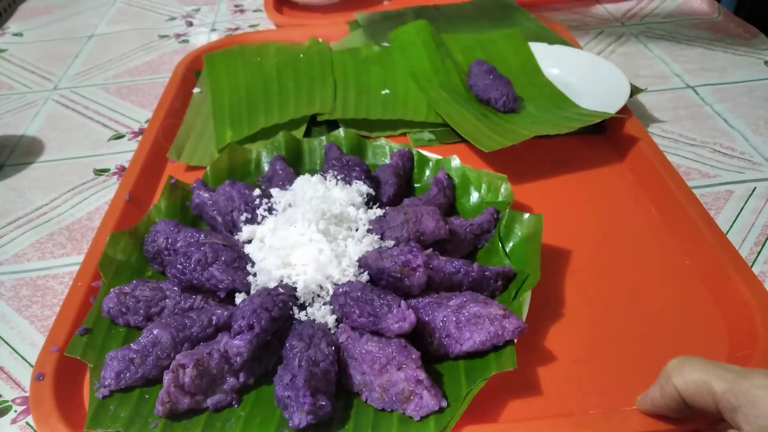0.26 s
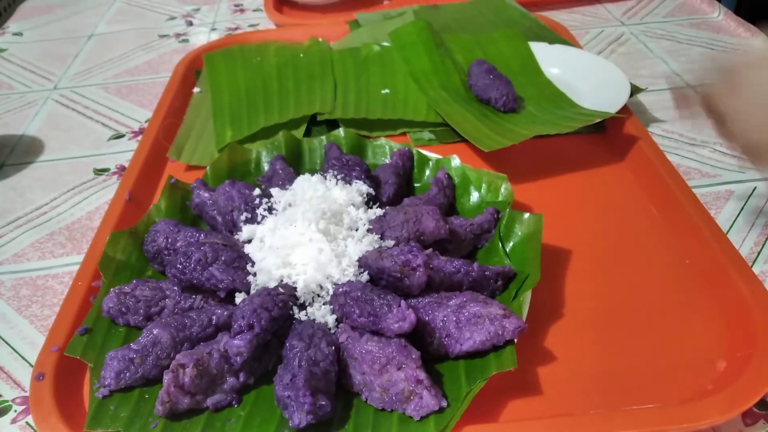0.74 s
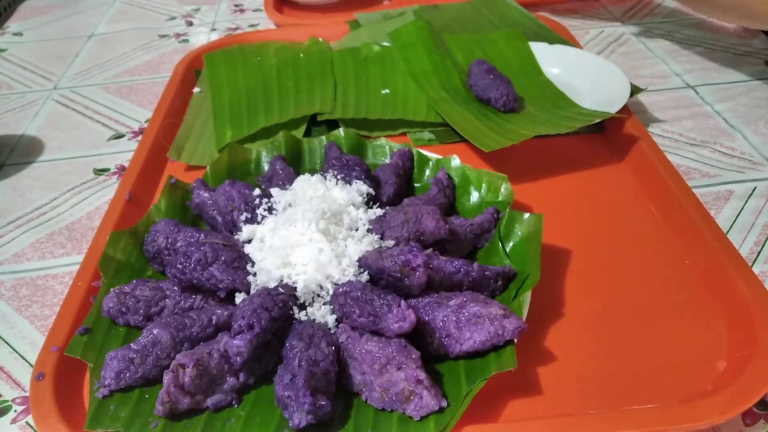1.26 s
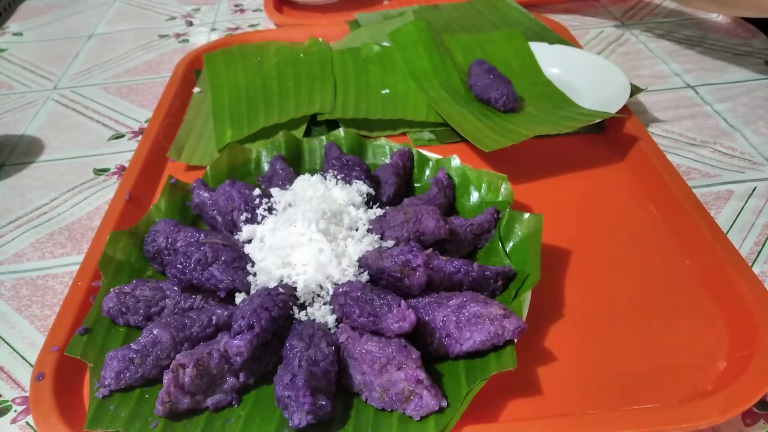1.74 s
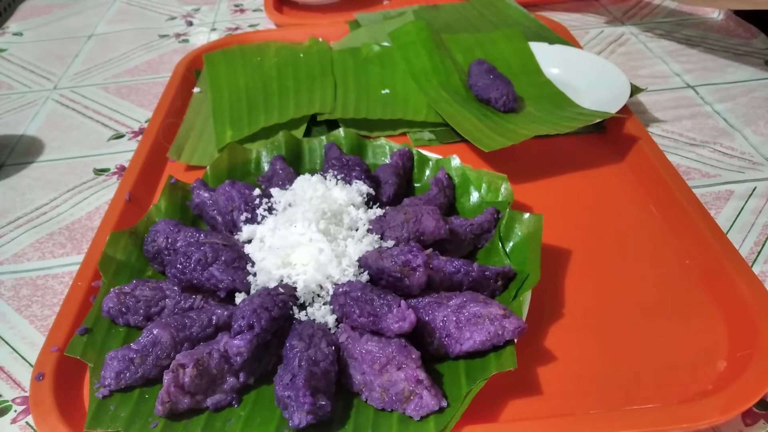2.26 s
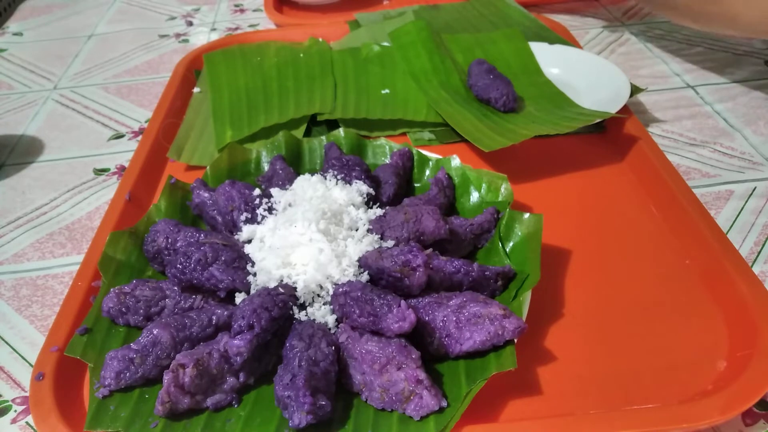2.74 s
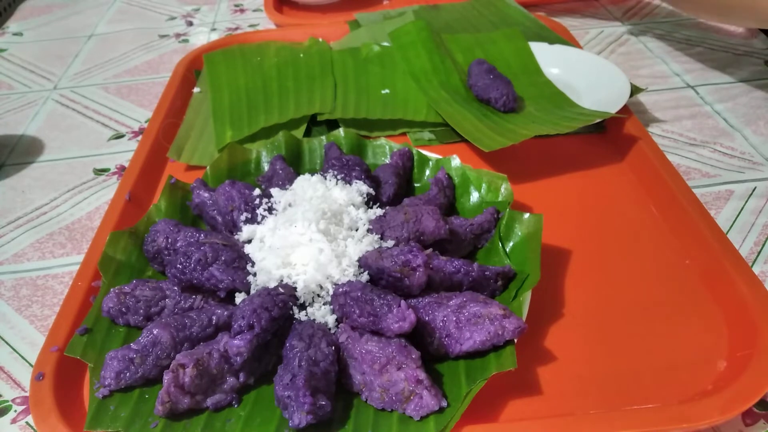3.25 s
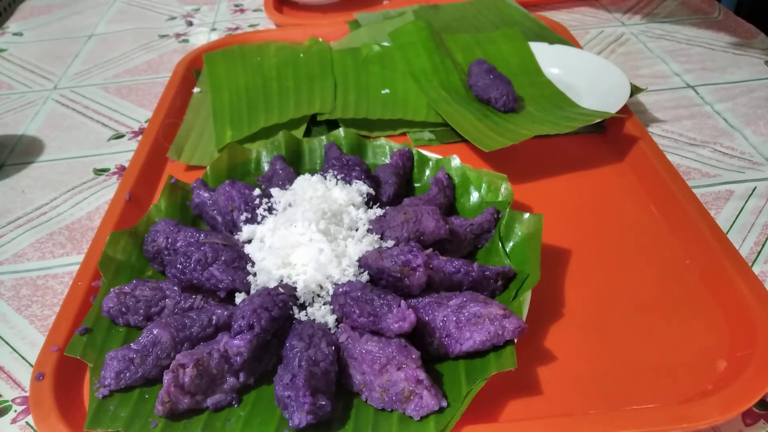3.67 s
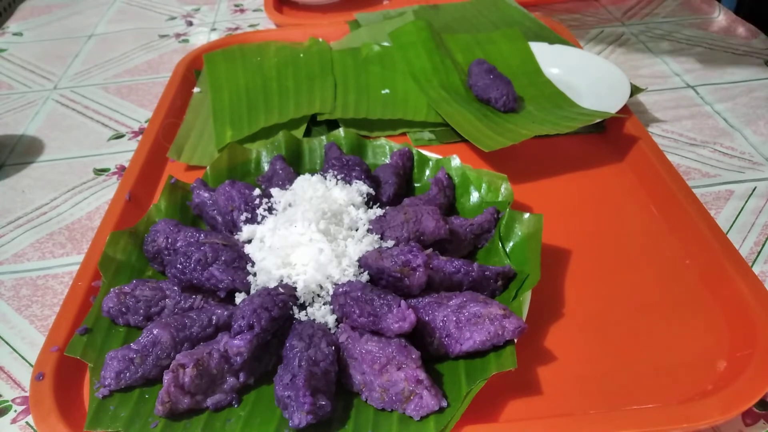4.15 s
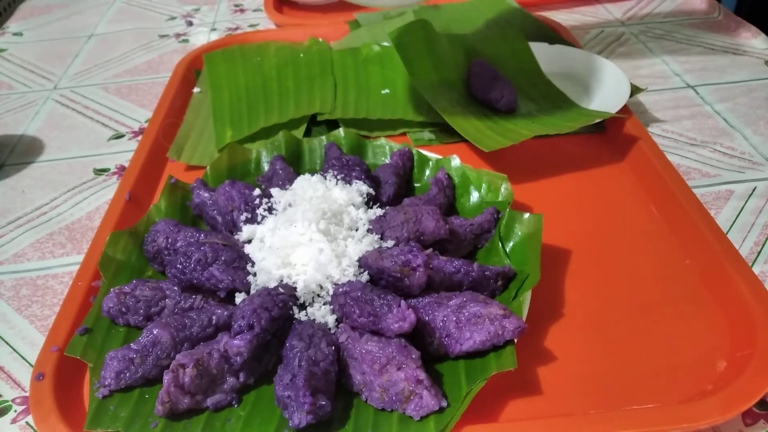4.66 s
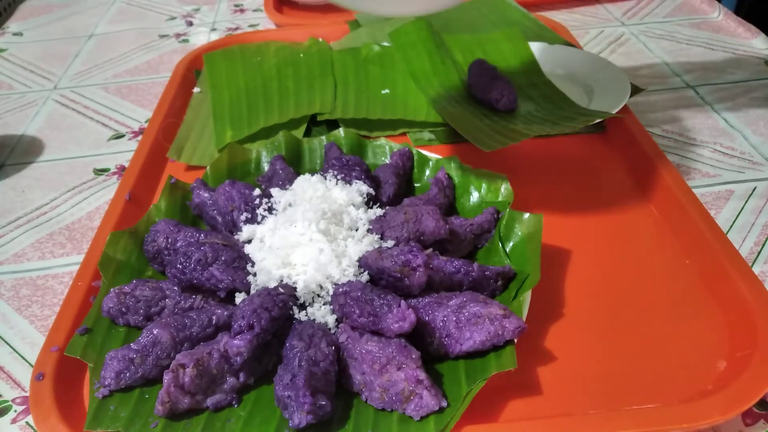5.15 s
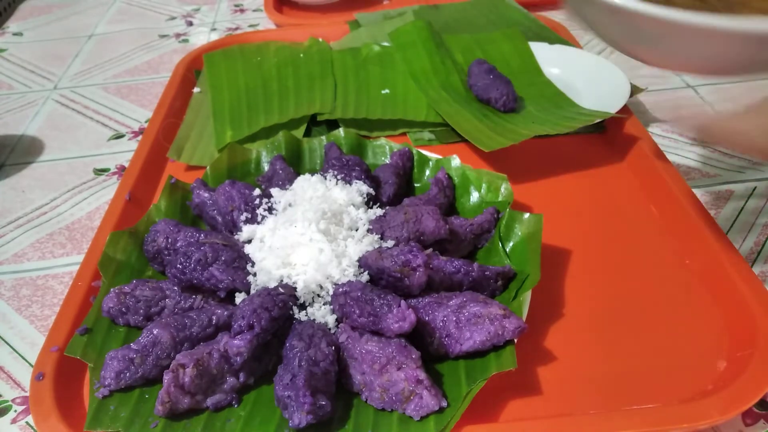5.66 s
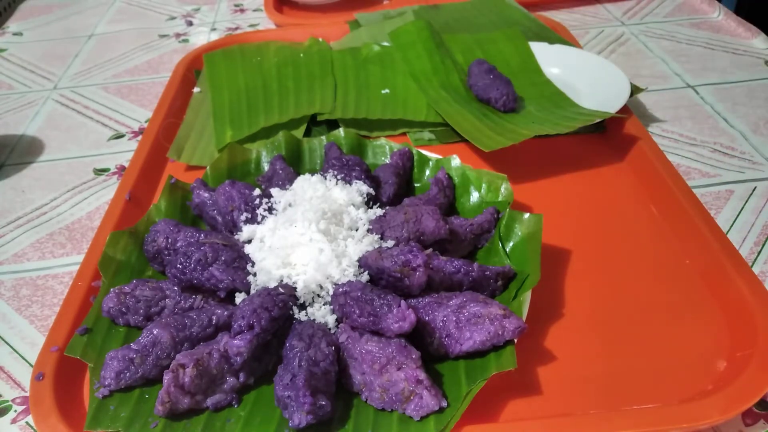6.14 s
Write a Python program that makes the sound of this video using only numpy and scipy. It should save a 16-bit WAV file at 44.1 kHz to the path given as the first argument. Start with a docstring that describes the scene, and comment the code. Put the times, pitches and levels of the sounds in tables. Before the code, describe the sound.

Stereo phone pickup, near and dry, small quiet room. Crisp film crackling starts faintly, swells around one second, ebbs and returns in small squeezes. A very soft clatter of dishes passes near three seconds. Denser snaps and quick little finger strokes follow, and finally one blunt, hollow bowl knock stands far above everything, ringing briefly with tiny settling bounces and last plastic snaps.

```python
"""A hand in a thin plastic glove gathers and sprinkles grated coconut, close to a phone in a quiet kitchen.
The film and the flakes rustle as dense tiny clicks that burst into noise, and single creases snap as short bursts.
Dishes nudge the table as blunt blows with a ring, and slide a little as stick and slip in one resonance.
Near the end a bowl is set down with a dull knock that rings the tray and the table top into the room.
The two microphone ports hear the sound slightly apart, over a low rumble and a thin hiss of room air."""
import sys
import numpy as np
from scipy import signal
from scipy.fft import rfft, irfft
from scipy.io import wavfile
from scipy.ndimage import uniform_filter1d

SR = 44100
rng = np.random.default_rng(int(sys.argv[2]) if len(sys.argv) > 2 else 0)


def log_audio(samples):
    """Write samples as a 16-bit WAV file to the path given in sys.argv[1]."""
    # one column per channel
    frames = np.atleast_2d(samples).T
    # limit to full scale, then quantise
    limited = np.clip(frames, -1, 1)
    pcm = np.round(limited * 32767).astype(np.int16)
    wavfile.write(sys.argv[1], SR, pcm)


N = 282240  # samples, 6.4 s
TIME = np.arange(N) / SR  # s

# Where the hand is and what it holds, joined by straight lines.
# Each row: time in seconds, left minus right in dB, loose flakes against the fine crackle in dB.
HAND_PLACE = [(0, 2, -4.5), (.8, 1, -38), (1.4, 0, -6), (2.8, 1.5, -37), (4.3, 1.5, -2), (5.3, 0.5, -15),
              (5.8, 3.5, 0), (6.4, 2.5, -6.5)]
# Bouts of handling, levels before the gains of the rustle.
# Each row: start in seconds, length in seconds, attack in seconds, crackle level in dB, rubbing level in dB.
HANDLING_BOUTS = [(0.017, 0.29, 0.067, -66.5, -73.5), (0.505, 0.61, 0.17, -51, -66.5),
                  (1.144, 0.78, .088, -58.5, -74), (2.112, 0.93, 0.38, -58.5, -69.5),
                  (2.564, 0.35, .051, -54.5, -75), (3.048, 0.12, 0.047, -64, -78),
                  (3.392, 0.37, 0.079, -61, -82), (3.616, 0.67, 0.12, -58.5, -71.5),
                  (4.462, 0.24, 0.034, -58, -70), (4.876, 0.4, 0.12, -62, -76),
                  (5.346, 0.25, 0.27, -65, -73.5), (5.845, 0.36, 0.16, -62.5, -73.5),
                  (6.111, 0.036, .005, -49, -59.5), (6.207, 0.11, 0.027, -57.5, -65.5)]
BOUT_RELEASE_DB_PER_S = 133
# Brief squeezes of the fingers, levels before the gains of the rustle.
# Each row: peak in seconds, length in seconds, crackle level in dB.
FINGER_SQUEEZES = [(0.52, 0.029, -47), (0.672, 0.071, -51), (0.77, 0.04, -52), (0.807, 0.11, -49),
                   (0.911, 0.066, -42), (1.012, 0.035, -50.5), (1.065, 0.074, -49.5), (1.129, 0.061, -48),
                   (1.377, 0.072, -56), (1.475, .04, -60), (1.605, 0.058, -54.5), (1.96, 0.042, -57.5),
                   (2.464, 0.09, -57.5), (2.62, 0.16, -49), (2.971, 0.081, -49.5), (3.921, 0.06, -49),
                   (3.975, 0.18, -55), (4.148, 0.056, -51.5), (4.38, 0.099, -57.5), (5.035, 0.025, -53),
                   (5.21, 0.037, -52), (5.855, 0.028, -57), (5.944, 0.021, -53), (6.383, 0.058, -51)]
SQUEEZE_RUB_DB = -14.5  # rubbing against crackle in a squeeze
# A run of quick finger strokes, to and fro, each a small squeeze; the way back is lighter.
STROKES_START_S, STROKE_PERIOD_S, STROKE_LENGTH_S = 4.706, 0.086, 0.03
STROKE_DB, BACK_STROKE_DB = -56, -3  # the second is relative to the first
# Colour of the crackling film. Each row: frequency in Hz, relative level in dB.
FILM_COLOUR = [(1200, -34.5), (2500, -15.5), (4000, -12), (6000, -6.5), (7500, -2), (9500, 2.5), (11500, 0),
               (14000, -6), (16000, -4)]
# Colour of the rubbing fingers. Each row: frequency in Hz, relative level in dB.
RUB_COLOUR = [(150, -11.5), (350, 2.5), (600, 2.5), (1000, 3), (1400, -1), (2100, 4.5), (3300, 3),
              (6000, 5.5), (12000, -41.5)]

# The loudest creases that snap, levels before the common gain of the snaps.
# Each row: start in seconds, level in dB, left minus right in dB, lower body against the bright tip in dB.
LOUD_SNAPS = [(0.0175, -47.5, -3, -11), (.279, -61, 0, -14), (.427, -54, -2, -8), (0.4506, -50, 4, -13),
              (0.4665, -51, 0, -14), (0.5, -43.5, 0, -7), (1.0105, -44.5, 0, -21), (1.35, -46.5, 7, 2),
              (1.452, -44, -1, -23.5), (1.5625, -48.5, -2, -20), (2.9568, -46, 6, -18),
              (3.108, -46.5, 0, -8), (3.701, -52, 7, -4), (4.3918, -58, 1, -11), (4.5438, -50, -7, -11),
              (4.62, -48.5, 2, -4), (4.6383, -43.5, 4, -11), (4.7176, -41.5, -1, -20),
              (4.738, -47.5, 5, -9), (4.793, -52, 6, 2), (4.802, -49, 2, -16), (4.8118, -41, 3, -12),
              (4.8144, -43, -8, -16), (4.9044, -46, -1, -6), (4.951, -54, -1, -13), (4.9836, -42, -1, -28),
              (4.986, -49, -5, -18), (4.9963, -40, 7, -14), (5.127, -43.5, -2, -7.5),
              (5.1548, -42.5, 5, -16), (5.277, -50, -5, -12), (5.297, -47.5, -1, -8), (5.314, -48, 0, -12),
              (5.399, -50, 2, -8), (5.413, -51, 1, -11), (5.495, -49, 2, -12), (5.5494, -48.5, 5, -13),
              (5.815, -52.5, -4, -6), (5.8912, -46, 8, -15), (5.9065, -45, 6, -5), (5.9213, -47, 1, -6),
              (5.948, -52, 9, -15), (5.989, -48.5, 3, -9), (6.05, -51.5, 9, 2), (6.1125, -45.5, 8, -1),
              (6.2178, -41.5, 9, -7), (6.2316, -45, 6, -21), (6.2722, -46, 10, 4), (6.289, -46, 3, 2),
              (6.3004, -40.5, 8, -2), (6.313, -47, 4, -11), (6.3221, -43.5, 14, -25), (6.3809, -45, 5, -1),
              (6.3946, -49, 9, -1)]
# Spells in which lesser creases snap at random, levels before the common gain of the snaps.
# Each row: start in seconds, length in seconds, snaps per second, mean level in dB, mean left minus right in dB.
CRINKLE_SPELLS = [(1.305, .5, 13, -60, 3), (3.598, .7, 19, -60, 2), (4.301, 1.0, 30.7, -57.5, -2),
                  (5.32, .3, 23, -72, 2), (5.738, .1, 78, -60.5, 6), (5.87, .53, 60, -57, 10)]
CRINKLE_SPREAD_DB, CRINKLE_BODY_DB = -1.5, -10  # random spread of level; mean body against tip
# Bright tip of a snap. Each row: frequency in Hz, relative level in dB.
CREASE_TIP_COLOUR = [(800, -42), (2500, -45), (4500, -24), (7500, 3), (10000, 10.5), (13000, 3),
                     (16000, -5)]
# Lower body of a snap or of a flake's tick. Each row: frequency in Hz, relative level in dB.
CREASE_BODY_COLOUR = [(500, -25), (1500, -7), (2500, -13.5), (3600, -5), (4800, 1.5), (6500, 1.5),
                      (8500, 2), (14000, -21)]
# How fast the tick of a loose flake and the snap of a crease fall by 60 dB.
FLAKE_T60_S, SNAP_T60_S = .008, .005

# Dishes meeting the table, and the bowl bouncing as it settles.
# Each row: start in seconds, level in dB, contact pitch in Hz, contact time in seconds,
# crack against the blow in dB, gain of the ringing in dB.
DISH_KNOCKS = [(2.815, -53.5, 490, 0.00066, -7, -8.5), (2.816, -58, 130, .0042, -17, -21),
               (2.842, -57.5, 380, 0.00052, -8, -8), (4.612, -56, 144.5, 0.0054, -27, -32),
               (6.1444, -10.5, 476, 0.00093, -23, -13.5), (6.15, -26, 440, 0.00062, -17.5, -28),
               (6.1633, -29, 325, 0.0021, -13, -19), (6.2003, -40, 430, 0.0011, -22, -24),
               (6.377, -49.5, 420, 0.00091, 1, -7)]
# Short crack of a knock. Each row: frequency in Hz, relative level in dB.
CRACK_COLOUR = [(100, 3.5), (400, 6.5), (800, 7.5), (1300, -1.5), (2000, -5), (2800, -14), (4500, -14),
                (10000, -31)]
# Modes of the tray and the table top.
# Each row: frequency in Hz, relative level in dB, 60 dB decay in seconds, left minus right in dB.
TRAY_MODES = [(82.5, -24, 0.3, -5), (114, -22.5, 0.19, -3), (259, -15, 0.34, -2), (302.5, 2, 0.12, 0),
              (366, -11, 0.24, -2), (394, -15, 0.3, 2), (428, -11, 0.29, -4), (456, -7.5, 0.31, -7),
              (488, -23, 0.41, -8), (531.5, 0.5, 0.11, 3), (570, -16, 0.26, -4), (618, -17, 0.18, -2),
              (693, -13, .15, 0), (773, -10, 0.16, -11), (836, -19, 0.25, 4), (1076, -18, 0.18, -8),
              (1000, -17, .14, 3), (1040, -20, 0.17, -3), (1203, -17, 0.15, 4), (1249, -10.5, 0.097, 5),
              (1350, -14.5, .13, 0), (1445, -19, 0.13, 3), (1750, -21, .1, 2), (2070, -22, 0.15, -2)]
# Colour of the room's answer to a knock. Each row: frequency in Hz, relative level in dB.
ECHO_COLOUR = [(60, -18), (170, -4.5), (270, 3), (450, -10), (600, -7), (800, 1.5), (1200, 4.5), (2000, -3),
               (4000, -13), (10000, -13)]
# Dishes sliding a little; the first row is a faint low bump of the hand. # Each row: start in seconds, length
# in seconds, centre in Hz, width in Hz, level in dB.
SLIDES = [(0.076, 0.17, 129, 199, -65.5), (2.405, 0.074, 3230, 1400, -64), (2.49, 0.25, 564, 70, -74),
          (2.624, 0.057, 2110, 1100, -62), (2.816, 0.057, 330, 560, -65), (2.83, 0.19, 540, 90, -72),
          (4.163, 0.11, 590, 98, -68), (4.6, 0.2, 90, 110, -72)]

# Colour of the quiet room. Each row: frequency in Hz, relative level in dB.
AIR_COLOUR = [(20, 12), (35, 3.5), (60, 1.5), (100, -10), (185, -3.5), (260, -8.5), (600, -16),
              (1200, -22.5), (3500, -26), (9500, -29.5), (15000, -39)]
# How much the two ports differ in diffuse sound. Each row: frequency in Hz, side against mid in dB.
PORT_WIDTH = [(100, -9.5), (300, -10), (600, -5.5), (1200, -2), (2400, -3), (4000, 1), (8000, -1.5)]
# The left port against the right one. Each row: frequency in Hz, left minus right in dB.
PORT_DIFFERENCE = [(100, 0), (2000, -0.1), (5000, -0.5), (7500, -2.5), (9200, -3.5), (10500, 0.5),
                   (12500, 7), (15000, 4.5)]
TOP_HZ = 14250  # upper limit of the phone


def rustle(film_gain_db=1.57, rub_gain_db=2.0, grip_db=1.4, flake_body_db=-8):
    """Film and flakes crackle finely; under it the fingers rub with a duller hiss."""
    film_db, rub_db = hand()
    side_db, loose_db = curves(HAND_PLACE)
    # the fingers catch and slip
    slip_db = grip_db * walk(28)
    # every grain faces the two ports differently
    clicks = grains(rate=2400, spread_db=2.0) * pan(4 * rng.standard_normal(N))
    # a short burst and a longer wash from each click
    fine = unit(smear(clicks, t60=.005) + smear(clicks, t60=.1))
    # loose flakes tick more sparsely and with more body
    ticks = grains(rate=360, spread_db=2.8) * pan(4 * rng.standard_normal(N))
    loose = unit(smear(ticks, t60=FLAKE_T60_S))
    flake_body = unit(colour(loose, CREASE_BODY_COLOUR))
    flakes = unit(colour(loose, FILM_COLOUR)) + undb(flake_body_db) * flake_body
    film = unit(unit(colour(fine, FILM_COLOUR)) + undb(loose_db) * flakes)
    rub = unit(colour(diffuse(smear(clicks, t60=0.066)), RUB_COLOUR))
    sound = film * undb(film_db + film_gain_db) + rub * undb(rub_db + rub_gain_db)
    return sound * undb(slip_db) * pan(side_db)


def hand():
    """Crackle and rubbing levels in dB: bouts of handling with squeezes swelling on top, adding in power."""
    film_power = rub_power = 1e-12
    for start, length, attack, film_db, rub_db in HANDLING_BOUTS:
        bout = held(start, length, attack, BOUT_RELEASE_DB_PER_S)
        film_power = film_power + (bout * undb(film_db)) ** 2
        rub_power = rub_power + (bout * undb(rub_db)) ** 2
    for peak, length, db in FINGER_SQUEEZES + strokes():
        swell = undb(db) * np.exp(-np.minimum((2 * (TIME - peak) / length) ** 2, 20))
        film_power = film_power + swell ** 2
        rub_power = rub_power + (swell * undb(SQUEEZE_RUB_DB)) ** 2
    return 10 * np.log10(film_power), 10 * np.log10(rub_power)


def strokes(count=8):
    """The run of finger strokes as rows of squeezes, every second one lighter."""
    return [(STROKES_START_S + k * STROKE_PERIOD_S, STROKE_LENGTH_S, STROKE_DB + k % 2 * BACK_STROKE_DB)
            for k in range(count)]


def snaps(level_db=20.5, room_db=-27, room_t60=0.18):
    """A crease flips in a burst of a few milliseconds, with a faint wash; its bright tip has a lower body."""
    t = TIME[:SR // 10]
    envelope = fade(t, SNAP_T60_S) + undb(room_db) * fade(t, room_t60)
    tips, bodies = np.zeros((2, 2, N))
    for start, db, side_db, body_db in LOUD_SNAPS + crinkles():
        # one burst for the tip and one for the body, each at both ports with energy 1
        burst = rng.standard_normal((2, 2, len(t))) * envelope
        burst = burst / np.linalg.norm(burst, axis=2, keepdims=True)
        # tip and body share the energy of the snap
        tip, body = burst * undb(db + level_db) * pan(side_db) / np.hypot(1, undb(body_db))
        add(tips, start, tip)
        add(bodies, start, body * undb(body_db))
    # colouring leaves the overall level of each part alone
    bright = unit(colour(tips, CREASE_TIP_COLOUR)) * np.std(tips)
    low = unit(colour(bodies, CREASE_BODY_COLOUR)) * np.std(bodies)
    return bright + low


def crinkles():
    """Lesser snaps scattered through each spell, as rows like the loud ones."""
    rows = []
    for start, length, rate, db, side_db in CRINKLE_SPELLS:
        chance = rng.standard_normal((64, 3))
        # one random moment in each slot of 1 / rate
        moments = (np.arange(len(chance)) + rng.random(len(chance))) / rate
        for s, (a, b, c) in zip(moments, chance):
            if s < length and start + s < TIME[-1]:
                level_db = db + CRINKLE_SPREAD_DB * a
                rows.append((start + s, level_db, side_db + 4 * b, CRINKLE_BODY_DB + 5 * c))
    return rows


def knocks(echo_db=-11.0, echo_t60=0.39, crack_t60=0.058, left_db=3, edge_db=6):
    """A blunt contact and a short crack, then the ringing tray and the room."""
    out, t = np.zeros((2, N)), TIME[:SR // 2]
    # the wave reaches the left port 0.3 ms before the right one
    age = np.maximum(t - np.array([[0], [.0003]]), 0)
    for start, db, hz, contact, crack_db, ring_db in DISH_KNOCKS:
        # the push peaks at twice the contact time
        push = (age / (2 * contact)) ** 2 * np.exp(2 - age / contact)
        blow = -np.sin(2 * np.pi * hz * age) * push
        grit = unit(colour(diffuse(rng.standard_normal((2, len(t)))), CRACK_COLOUR))
        # the hard rim lands first, as one sharp edge
        edge = -np.sin(2 * np.pi * 2100 * age) * fade(age, 0.002)
        crack = grit * fade(t, crack_t60) + undb(edge_db) * edge
        strike = blow + undb(crack_db) * crack
        # the room answers with decaying noise that builds up over 7 ms
        walls = diffuse(rng.standard_normal((2, len(t)))) * fade(t, echo_t60) * np.minimum(t / 0.0069, 1)
        echo = signal.fftconvolve(strike, colour(walls, ECHO_COLOUR), axes=1)[:, :len(t)]
        echo = unit(echo) * np.std(strike) * undb(echo_db)
        ring = undb(ring_db) * tray(age, hz, contact)
        add(out, start, undb(db) * (strike + ring + echo))
    return out * pan(left_db)


def tray(age, blow_hz, contact, build_up=0.0034):
    """The tray's modes swell in step with the blow that drives them, then ring out; each has its own balance."""
    ring = 0
    for hz, db, t60, side_db in TRAY_MODES:
        # phase lag set by the mode's distance from the pitch of the blow
        lag = 3 * np.arctan(2 * np.pi * (hz - blow_hz) * contact)
        mode = np.sin(2 * np.pi * hz * age - lag) * fade(age, t60)
        ring = ring - undb(db) * pan(side_db) * mode
    return ring * (1 - np.exp(-(age / build_up) ** 2))


def slides(grain_t60=0.01):
    """Short bouts of stick and slip, each heard through one resonance."""
    out = np.zeros((2, N))
    # the same catches in three unrelated noises: one shared by both ports, one for each
    catches = smear(grains(rate=1000, spread_db=1.5) * np.ones((3, 1)), grain_t60)
    friction = catches[:1] + .5 * catches[1:]
    for start, length, hz, width, db in SLIDES:
        first, count = int(start * SR), int(length * SR)
        band = [max(hz - width / 2, 30), hz + width / 2]
        body = signal.butter(2, band, "bandpass", fs=SR, output="sos")
        scrape = signal.sosfilt(body, friction[:, first:first + count])
        swell = np.sin(np.linspace(0, np.pi, count))
        add(out, start, unit(scrape) * swell * undb(db))
    return out


def air(level_db=-65):
    """Quiet room: a low rumble under a thin hiss, as coloured noise."""
    return undb(level_db) * unit(colour(diffuse(rng.standard_normal((2, N))), AIR_COLOUR))


def undb(db):
    """Decibels to gain."""
    return 10 ** (np.asarray(db) / 20)


def unit(x):
    """Scale to rms 1."""
    return x / np.sqrt(np.mean(x ** 2))


def pan(db):
    """Left and right gains for a level difference."""
    return undb(np.array([[.5], [-.5]]) * db)


def colour(x, points):
    """Causal minimum-phase filter whose gain follows (Hz, dB) points."""
    size = 4096
    hz, db = np.transpose(points)
    grid = np.maximum(np.fft.rfftfreq(size, 1 / SR), 1)
    gain = undb(np.interp(np.log(grid), np.log(hz), db))
    # folding the cepstrum onto positive times makes the response causal
    cepstrum = irfft(np.log(gain))
    cepstrum[1:size // 2] *= 2
    cepstrum[size // 2 + 1:] = 0
    response = irfft(np.exp(rfft(cepstrum)))
    return signal.fftconvolve(x, response[None], axes=1)[:, :x.shape[1]]


def fade(t, t60):
    """Exponential decay, 60 dB down after t60."""
    return np.exp(-np.log(1000) * t / t60)


def held(start, length, attack, release_db_per_s):
    """Envelope that is full at the start, holds for a length and dies away; the attack comes before."""
    rise = np.clip(1 + (TIME - start) / attack, 0, 1) ** 2
    return rise * undb(-release_db_per_s * np.maximum(TIME - start - length, 0))


def walk(rate):
    """Smooth random wander with rms 1 or close to it, from a number of new values per second."""
    k = max(int(SR / rate), 2)
    steps = np.repeat(rng.standard_normal(N // k + 1), k)
    return unit(uniform_filter1d(steps, k))[:N]


def curves(table):
    """The columns of a table of (s, value, ..) rows, one value per sample."""
    s, *columns = np.transpose(table)
    return [np.interp(TIME, s, column) for column in columns]


def grains(rate, spread_db):
    """Tiny impulses of uneven size at random moments, so many per second on average."""
    size_db = spread_db * np.minimum(rng.exponential(size=N), 4)
    return (rng.random(N) < rate / SR) * undb(size_db)


def smear(clicks, t60):
    """Each click scatters into a fresh burst of noise that dies away."""
    keep = fade(2 / SR, t60)  # energy kept per sample
    energy = signal.lfilter([1 - keep], [1, -keep], clicks ** 2 + 1e-20)
    return np.sqrt(energy) * rng.standard_normal(clicks.shape)


def diffuse(pair):
    """Two unrelated signals as one diffuse sound: more alike at the ports in the bass than in the treble."""
    mid, side = pair[:1], colour(pair[1:], PORT_WIDTH)
    return mid + side * np.array([[1], [-1]])


def add(out, start, sound):
    """Mix a sound in at a time in seconds."""
    i = int(start * SR)
    out[:, i:i + sound.shape[1]] += sound[:, :N - i]


def scene():
    """Hand, dishes and room together."""
    return rustle() + snaps() + knocks() + slides() + air()


def record(dry):
    """The two ports differ, mostly in the treble, and the phone cuts the top."""
    left = colour(dry[:1], [(hz, db / 2) for hz, db in PORT_DIFFERENCE])
    right = colour(dry[1:], [(hz, -db / 2) for hz, db in PORT_DIFFERENCE])
    low_pass = signal.ellip(10, .2, 70, TOP_HZ, fs=SR, output="sos")
    return signal.sosfilt(low_pass, np.vstack([left, right]))


dry = scene()
out = record(dry)
log_audio(out)
```